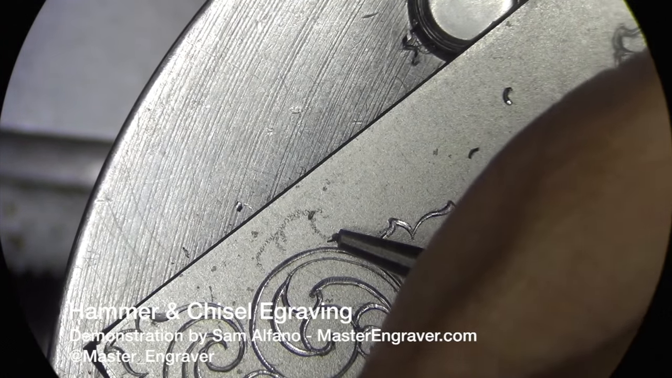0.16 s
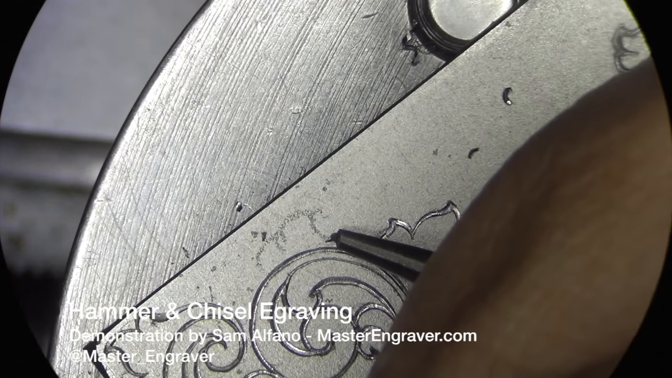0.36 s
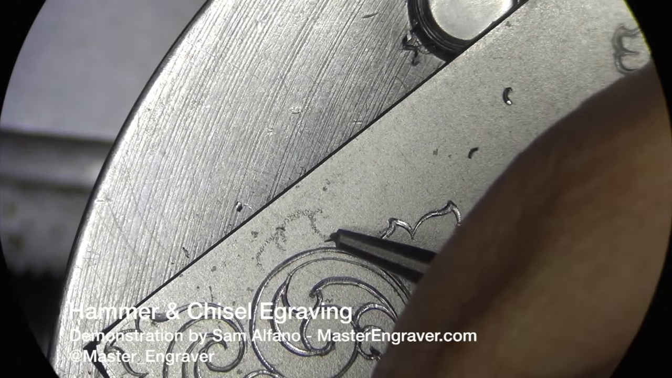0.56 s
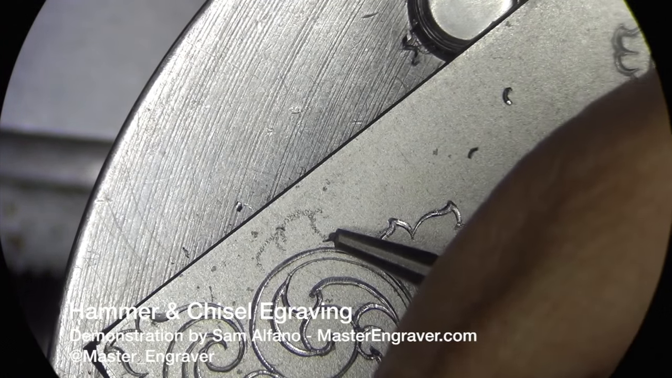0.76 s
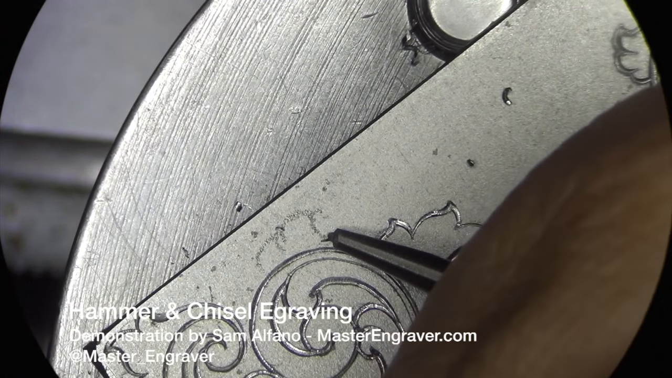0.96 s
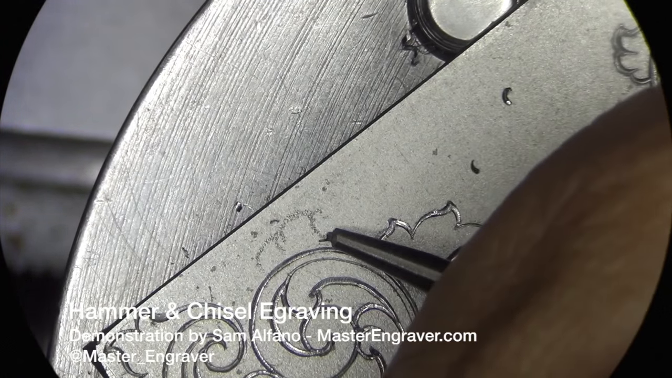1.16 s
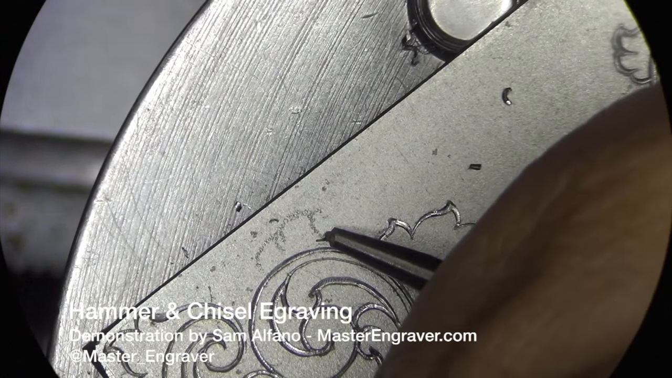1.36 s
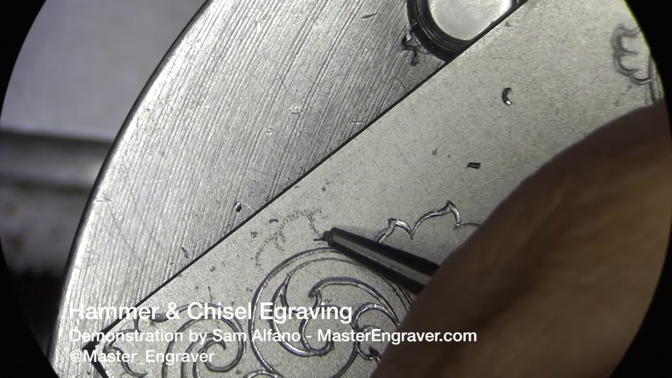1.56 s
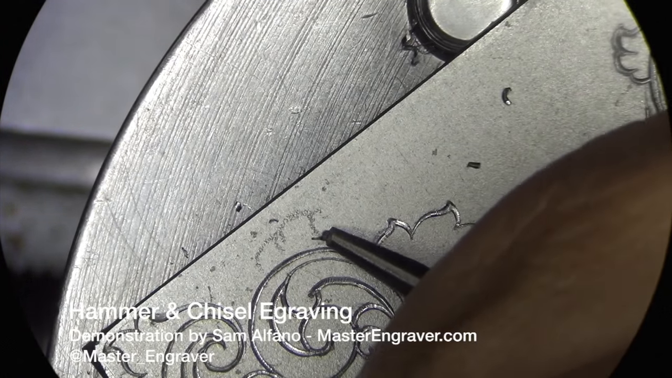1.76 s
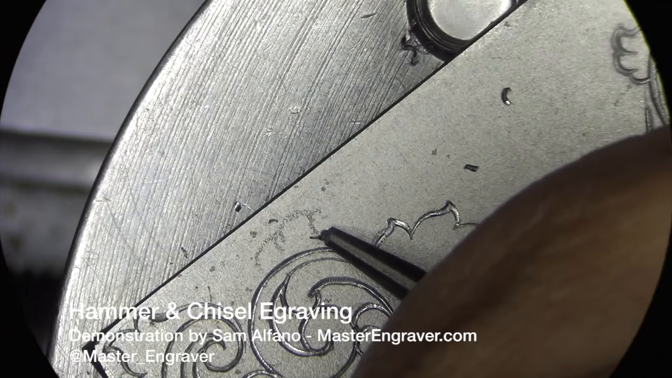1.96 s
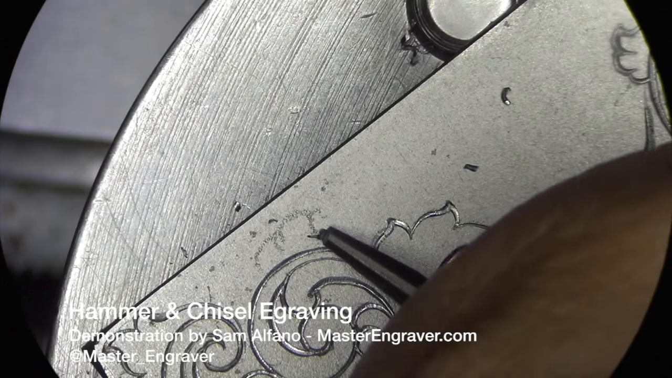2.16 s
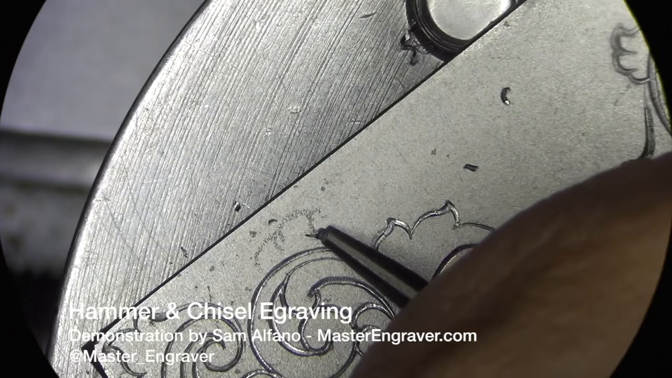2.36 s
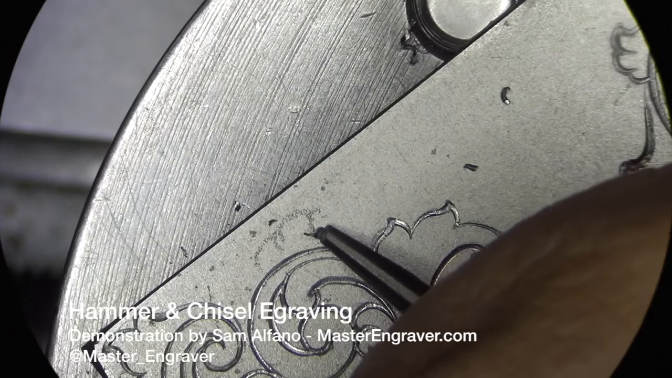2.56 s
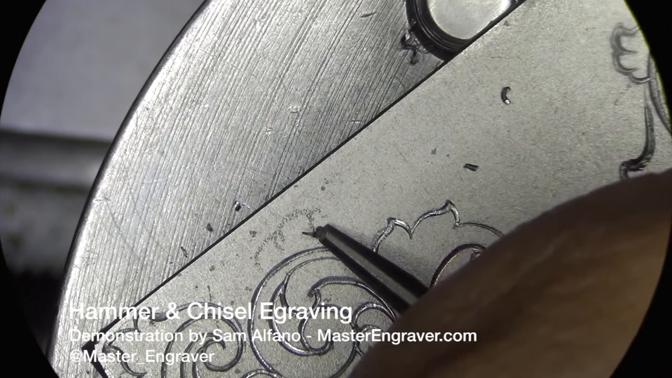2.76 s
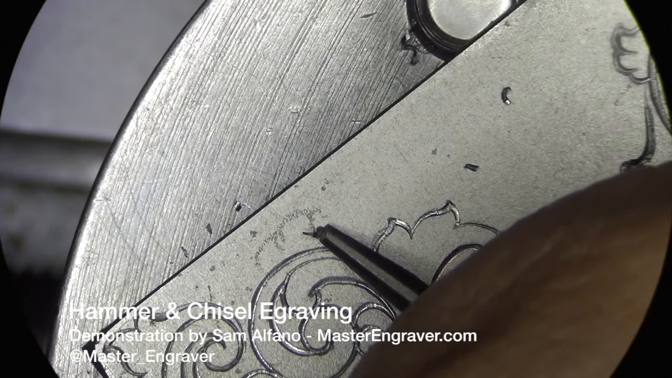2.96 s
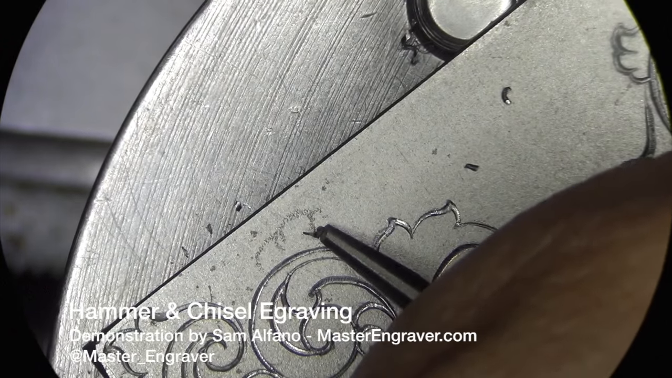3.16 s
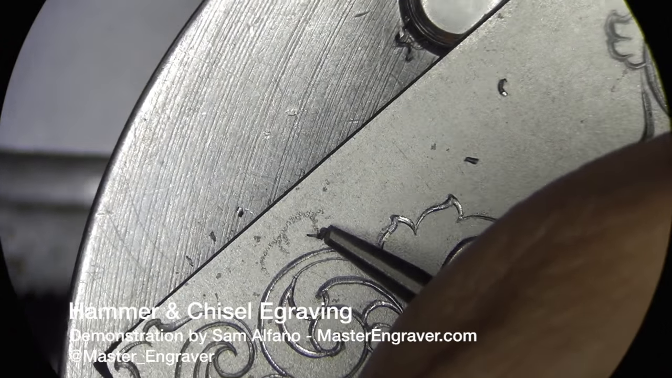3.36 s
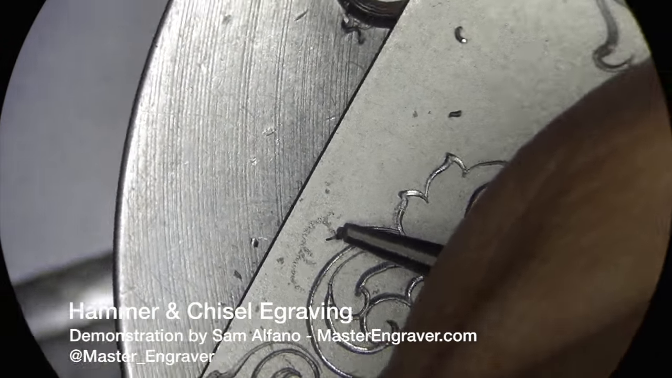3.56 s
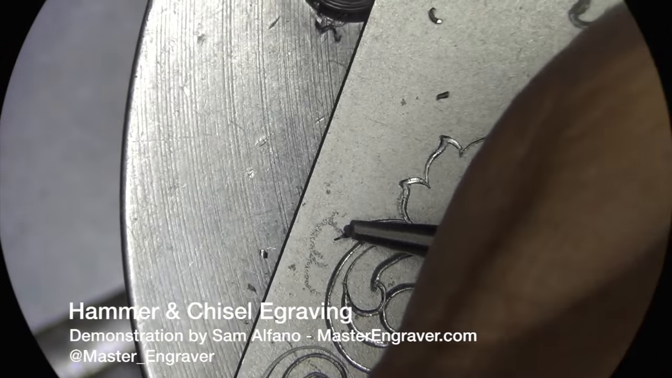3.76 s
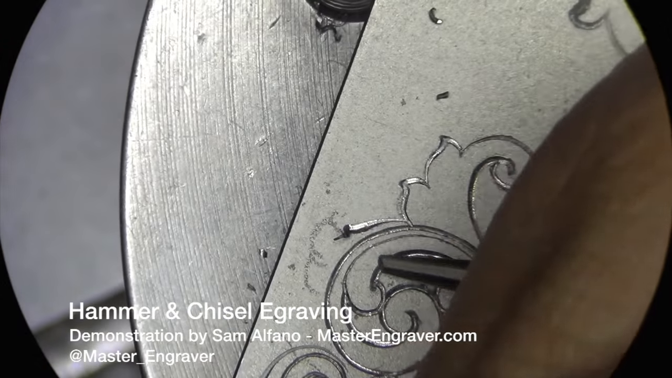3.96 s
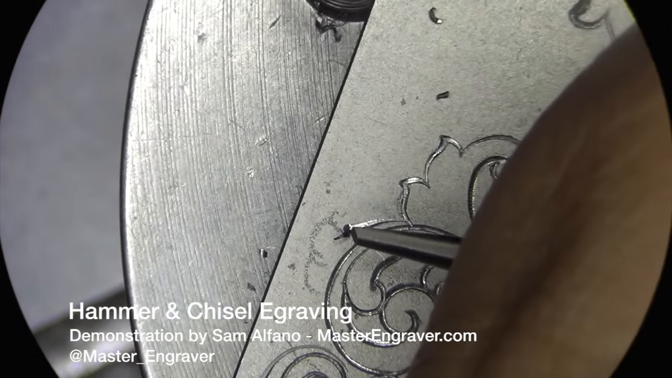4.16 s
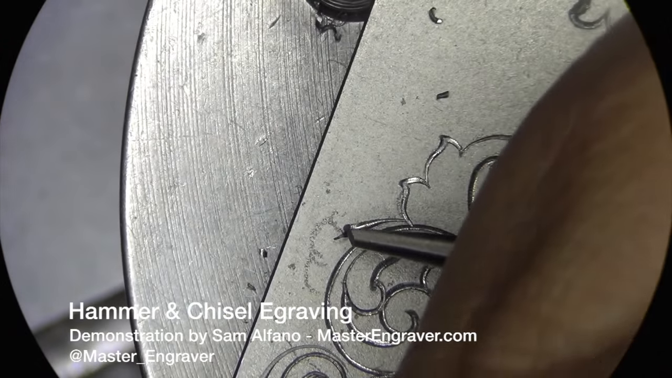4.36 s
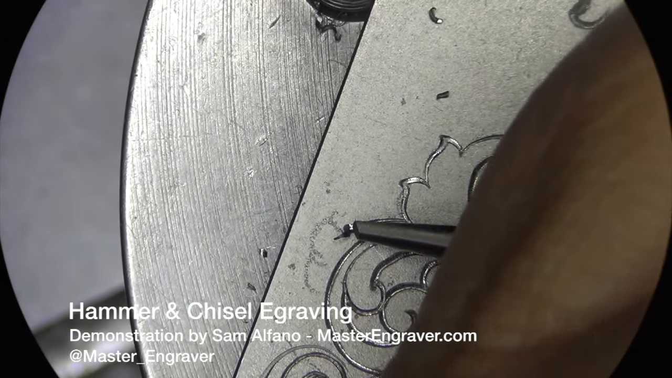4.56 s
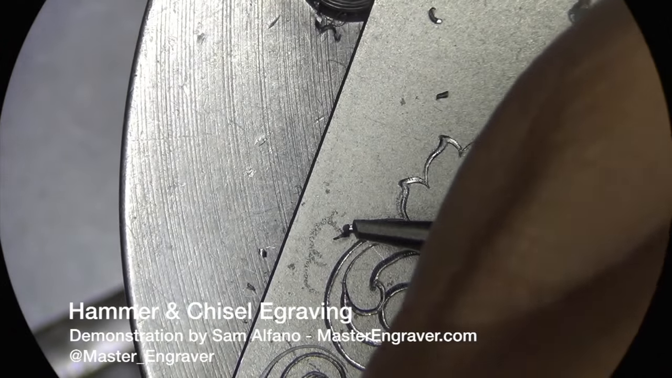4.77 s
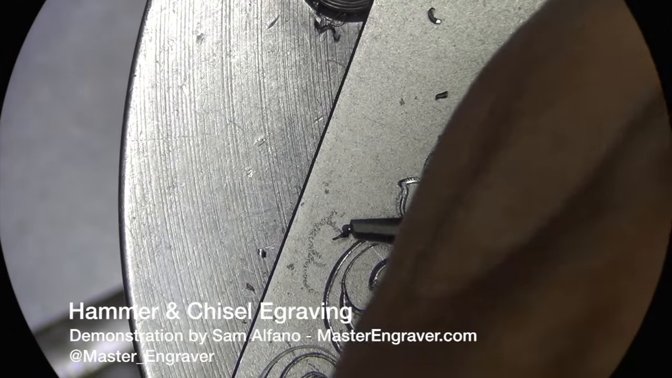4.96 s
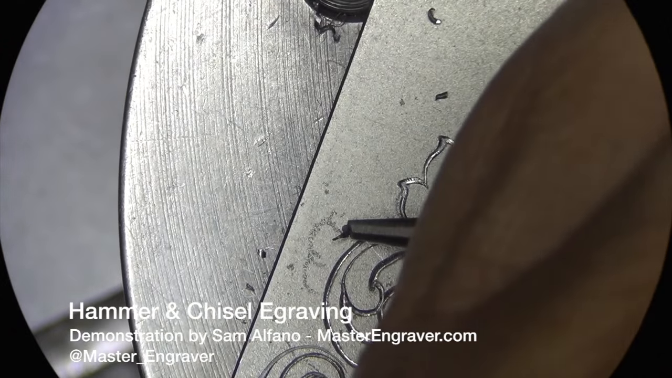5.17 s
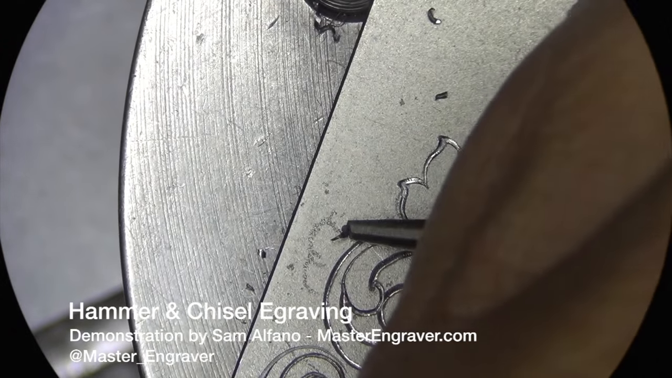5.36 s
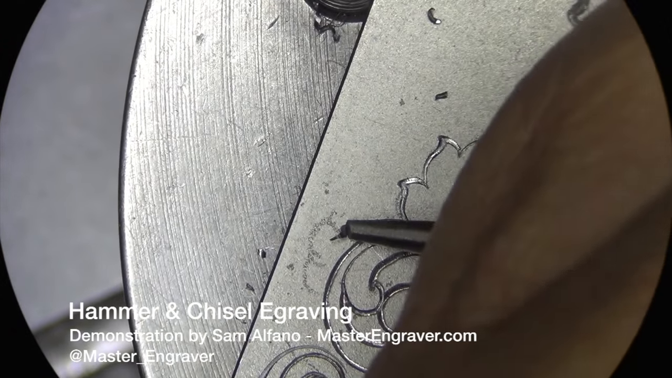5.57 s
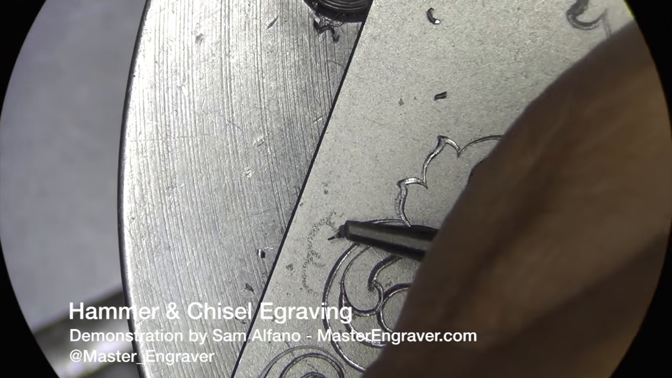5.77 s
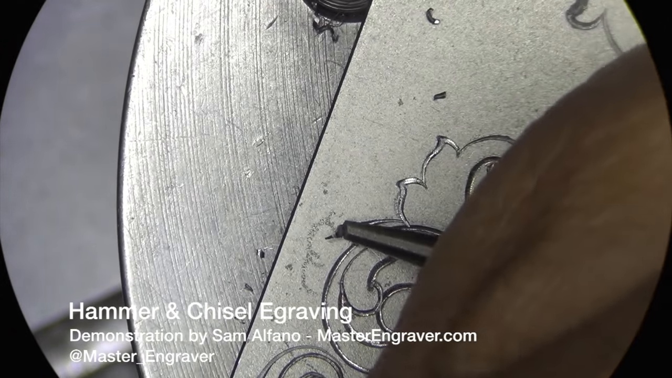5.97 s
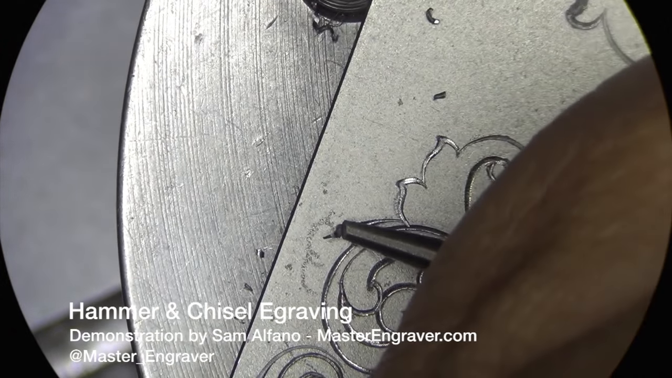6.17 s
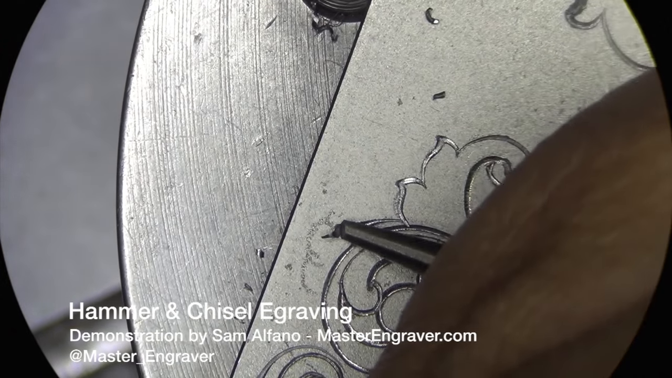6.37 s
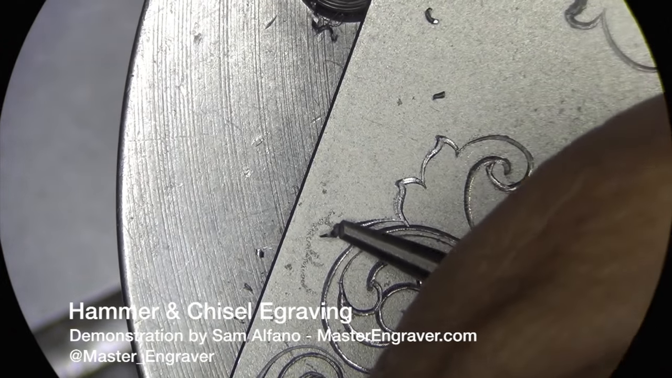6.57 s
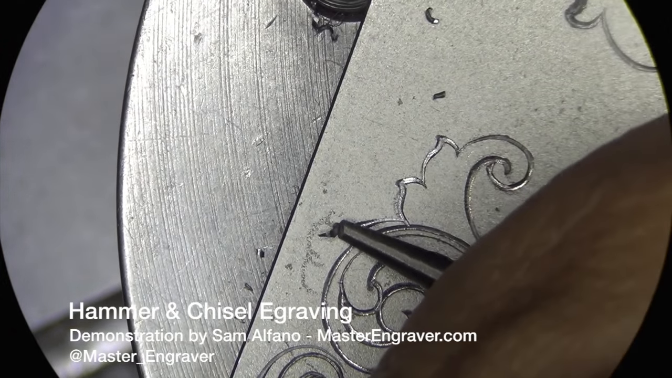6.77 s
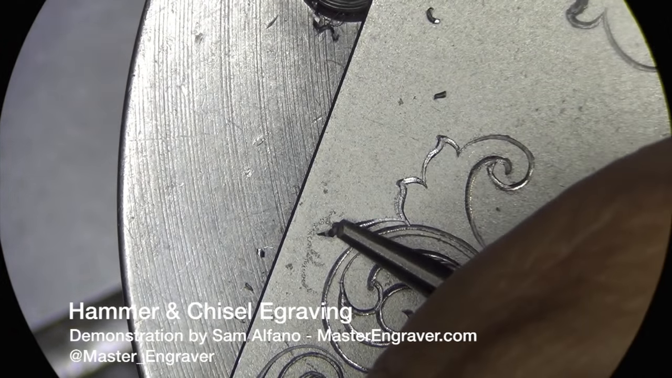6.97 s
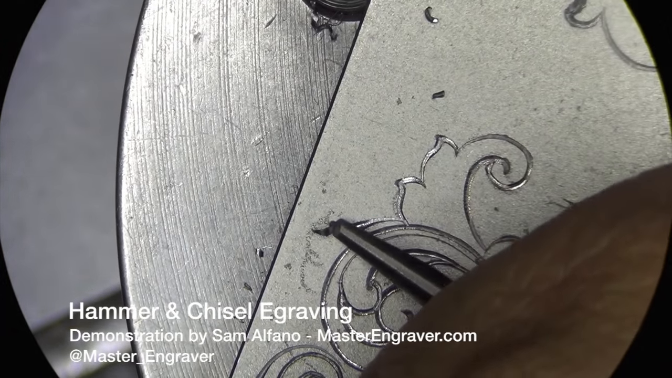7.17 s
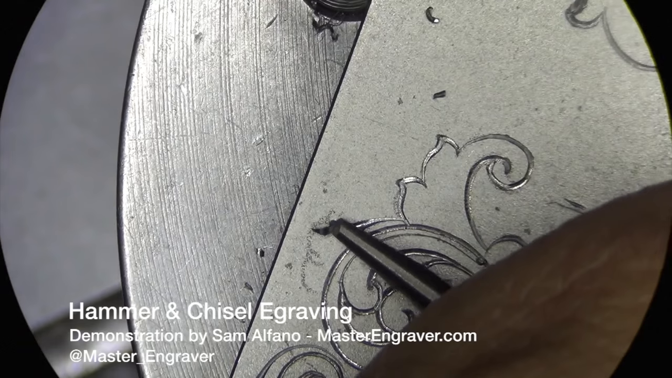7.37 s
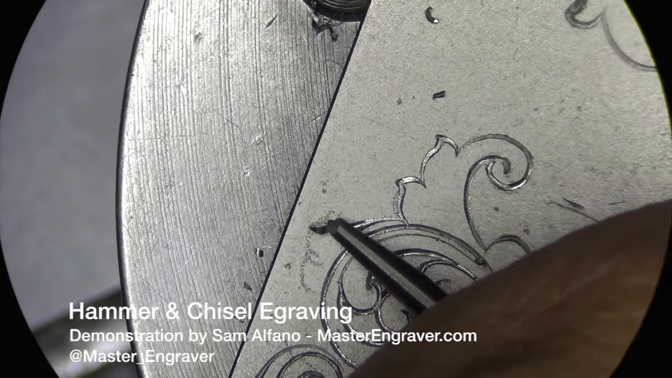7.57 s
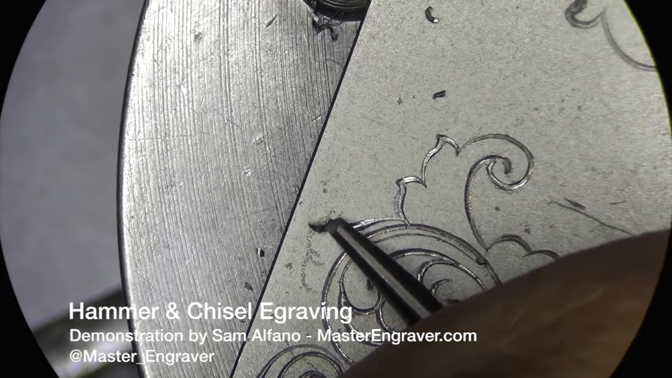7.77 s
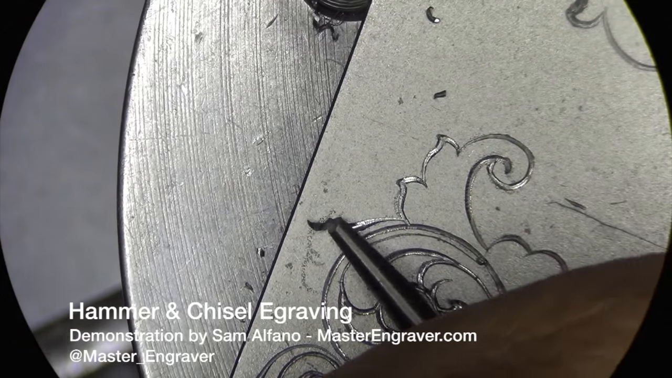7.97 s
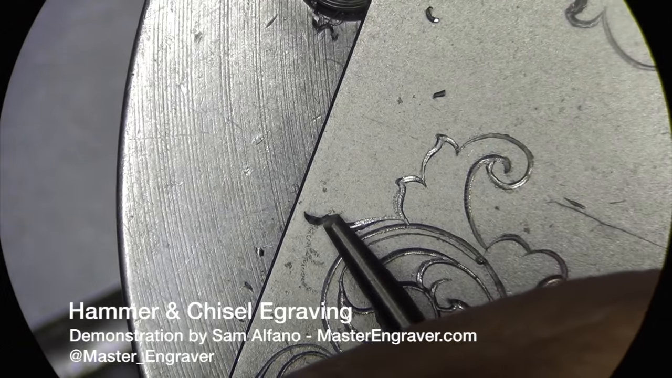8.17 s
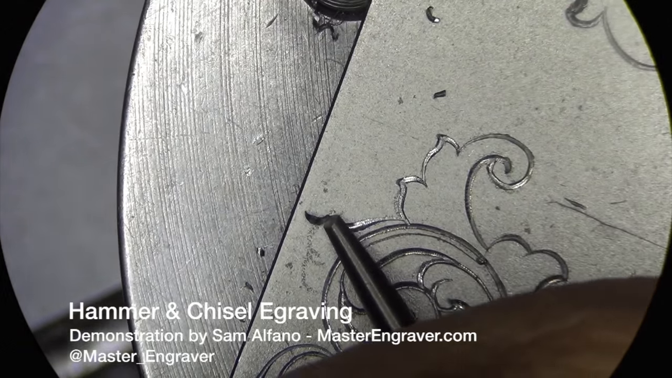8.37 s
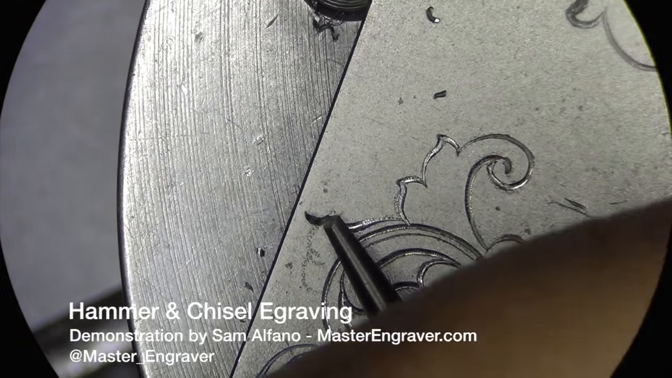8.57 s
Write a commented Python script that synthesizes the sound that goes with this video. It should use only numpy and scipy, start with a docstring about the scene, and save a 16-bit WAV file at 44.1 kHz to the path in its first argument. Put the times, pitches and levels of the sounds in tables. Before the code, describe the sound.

Sharp, dry metallic ticks at five a second, a pause with a brief scrape and tiny knocks, then more ticks in a hard-walled workshop.

```python
"""A fan's whirr, mains hum, air noise and a monitor's thin whine run throughout as shaped noise and tones.
Over them a small hammer drives an engraving chisel through a steel plate in a vise, about five blows a second.
Each blow is a cluster of damped steel modes with a noisy bite; some thump the bench, and a hard workshop answers.
As the first run of blows ends the vise is swivelled: rubbing, drag and small knocks, made of filtered noise.
A second even run follows; a few blows near the start and end of the cuts leave short pitched rings."""
import sys
import numpy as np
from scipy import signal
from scipy.fft import rfft, irfft, next_fast_len
from scipy.io import wavfile

SR = 44100
rng = np.random.default_rng(int(sys.argv[2]) if len(sys.argv) > 2 else 0)


def wav_out(sig):
    """Save sig, one row per channel (or a flat mono array), as 16-bit PCM at SR to the path in sys.argv[1]."""
    wavfile.write(sys.argv[1], SR, np.round(np.clip(np.atleast_2d(sig).T, -1, 1) * 32767).astype(np.int16))


N = 380141

# colour of the air noise: f/Hz, level/dB per Hz (relative)
AIR_COLOUR = [(20, -18.5), (55, 2), (100, -1), (135, 0.5), (200, -2.5), (270, -1), (420, -6), (680, -5.5),
              (950, -5), (1250, -12), (1550, -10.5), (2800, -17.5), (7000, -20.5), (15500, -21)]
# tones of mains and fan motor: f/Hz, level/dB rms
HUM_TONES = [(59.5, -73.5), (120, -75), (239, -89), (294.5, -74), (1812, -83.5)]
# hammer blows: t/s, strength/dB, hardness of the contact as extra treble/dB
BLOWS = [(0.1675, 0, 2), (0.3901, 1.5, 6.5), (0.596, 1.5, 5.5), (0.8037, 0.3, 6), (1.0043, -0.3, 6.5),
         (1.204, -1, 4.5), (1.4072, 0, 5), (1.6062, -0.5, 5), (1.8066, 1, 4.5), (2.0005, 0.2, 6.5),
         (2.1987, 0.9, 5), (2.3924, 2.5, 4.5), (2.601, 0.8, 4.5), (2.8035, 2.2, 4), (5.171, -2.5, 2.5),
         (5.3923, -3, 2), (5.5957, -0.7, 2.5), (5.7872, -1.7, 1.5), (5.9864, -1.5, -1), (6.1787, -1.7, 1.4),
         (6.3555, -1.4, -0.5), (6.5489, -1.2, -1.5), (6.7355, -0.5, -0.8), (6.9145, -0.9, -2),
         (7.0791, -0.8, -1.8), (7.2448, -0.5, 0), (7.4074, -0.5, -2.5), (7.5743, 0.2, 1),
         (7.739, -0.5, 1.4), (7.917, -2.5, 3.5), (8.094, -4.5, 1.6), (8.2657, -4, 1)]
# chisel, plate and vise ringing together: f/Hz, t60/s, level in first cut/dB, level in second cut/dB
STEEL_MODES = [(473, 0.029, -37.5, -31), (850, 0.015, -33.5, -26), (1061, 0.0089, -29.5, -30),
               (1502, 0.023, -28.5, -22), (1825, 0.022, -26, -25), (2136, 0.015, -18.5, -17),
               (2483, 0.016, -18, -20), (2846, 0.0064, -13, -7.5), (3280, 0.006, -10, -13.5),
               (3966, 0.0046, -11.5, -7), (4626, 0.0055, -8, -8.5), (5166, 0.0082, -9.5, -8),
               (5603, 0.015, -13.5, -13), (6007, 0.012, -15, -10.5), (6710, 0.013, -15.5, -18),
               (7130, 0.01, -23.5, -16.5), (7810, 0.011, -22.5, -19.5), (8360, 0.007, -26.5, -20),
               (9180, 0.0063, -15.5, -14), (9920, 0.0081, -22, -18), (10590, 0.0053, -19, -15.5),
               (11480, 0.0056, -28.5, -17.5), (12330, 0.01, -25.5, -20.5), (14170, 0.0034, -20.5, -17.5),
               (14700, 0.0064, -24.5, -22.5)]
# the workshop's answer, ahead of the room send: f/Hz, level/dB, t60/s
ROOM_BANDS = [(120, 10, 0.51), (257, 6.5, 0.35), (480, -2.5, 0.311), (1010, 2.5, .42), (1888, -3, 0.51),
              (3140, 0, 0.52), (4250, -1.5, 0.56), (4990, -9, 0.55), (6000, -4.5, 0.49), (9130, -3, 0.42),
              (15150, -2.5, 0.33)]
# sound that gets past the moving hand into the room: t/s, level/dB
ROOM_SPILL = [(0.17, -3), (0.39, -0.5), (1.35, 4), (2.35, 2), (2.8, -0.5), (5.17, -4.5), (6.0, -0.9),
              (7.7, -5.5), (8.05, -4.5)]
# notes of the steel where the grip is light: t/s, f/Hz, level/dB, t60/s
LOOSE_RINGS = [(0.1687, 2200, -15.5, 0.023), (5.171, 2300, -29, 0.013), (5.1712, 4300, -18, 0.016),
               (7.9178, 1510, -25, 0.05), (7.9165, 3980, -16, 0.018), (8.0942, 1463, -22, 0.041),
               (8.2658, 925, -30, 0.041), (8.2663, 3860, -33.5, 0.19)]
# blows that go through into the bench, ahead of the thump trim: t/s, level/dB
BENCH_THUMPS = [(0.8039, -36), (1.205, -42), (2.3938, -35.5), (2.599, -39), (2.805, -25), (6.5488, -39),
                (6.7356, -34)]
# turns of the vise: t at the loudest/s, length/s, rubbing level/dB, low drag level/dB
VISE_TURNS = [(1.406, 0.58, -81, -58.5), (3.602, 0.32, -56, -66.5), (3.956, 0.26, -68, -59),
              (6.592, 0.34, -83, -60.5)]
# colour of the rubbing: f/Hz, level/dB per Hz (relative)
RUB_COLOUR = [(150, -27), (330, -13), (500, 4), (800, -8), (1150, -4.5), (1600, -4.5), (2700, -10),
              (3650, -12.5), (4200, -21), (9000, -26), (15000, -37.5)]
# light contacts as the work is turned, ahead of the trims: t/s, level/dB, knock/dB, steel/dB
LIGHT_TOUCHES = [(3.241, -44, -2.5, -18), (3.279, -29.5, -8, -32), (3.932, -29.5, -16, -5),
                 (3.948, -42, -16, -1), (3.982, -49, -16, -5), (4.695, -48, -16, -4.5)]

SECOND_CUT_S = 4  # blows from here on belong to the second cut
# each cut starts at the surface, is deepest this long after its first blow, then slowly runs out
DEEPEST_S = 0.9
PLATE_FREE_DB, PLATE_DAMPED_DB = 0.5, -4.5  # plate near 1.5 kHz: edge at the surface, fully buried
BODY_FREE_DB, BODY_DAMPED_DB = 0, -3.65  # the same for the chisel's body near 3 kHz
ENTRY_DB, ENTRY_S = 5, 0.2  # extra ring of the plate as a cut begins, and its time constant
BODY_FOLLOWS = 0.41  # dB of plate and body per dB of strength: harder blows are brighter
TURN_EDGE_DB = -8  # level at both ends of a turn, against its middle
TOP_HZ = 15850  # band limit of the recorder


def amp(db):
    """Gain of a level in dB."""
    return 10 ** (np.asarray(db) / 20)


def unit(x):
    """Scale to rms 1."""
    return x / np.sqrt(np.mean(x ** 2) + 1e-20)


def along(points, hz):
    """Read a curve of (Hz, value) points on a log frequency axis."""
    f, v = np.transpose(points)
    return np.interp(np.log(hz + 1), np.log(f + 1), v)


def filtered(x, response):
    """Shape x by a response of frequency."""
    n = x.shape[-1]
    padded = next_fast_len(n + 8192)
    return irfft(rfft(x, padded) * response(np.fft.rfftfreq(padded, 1 / SR)), padded)[..., :n]


def noise(response):
    """Coloured noise of rms 1, as long as the scene."""
    return unit(filtered(rng.standard_normal(N), response))


def band(hz, centre_hz, width_hz):
    """Response of one resonance."""
    return 1j * hz * width_hz / (centre_hz ** 2 - hz ** 2 + 1j * hz * width_hz)


def add(track, s, sound):
    """Mix a sound in at time s."""
    part = track[..., round(s * SR):][..., :sound.shape[-1]]
    part += sound[..., :part.shape[-1]]


def workshop(air_db=-61.5, fan_db=-63.5, fan_hz=878, fan_width_hz=110, side_db=-69, whine_db=-69):
    """Mid and side of the background: air noise, a fan's narrow whirr, hum and a monitor's thin whine."""
    t = np.arange(N) / SR
    air = amp(air_db) * noise(lambda hz: amp(along(AIR_COLOUR, hz)))
    fan = amp(fan_db) * noise(lambda hz: band(hz, fan_hz, fan_width_hz) ** 2)
    hum = np.zeros(N)
    for tone_hz, db in HUM_TONES:
        hum += amp(db) * np.sqrt(2) * np.sin(2 * np.pi * (tone_hz * t + rng.random()))
    whine = amp(whine_db) * noise(lambda hz: band(hz, 15736, 10))
    # the side is widest in the bass
    width = [(60, 4), (130, -16.5), (300, -8.5), (2000, -22.5)]  # f/Hz, level/dB
    side = amp(side_db) * noise(lambda hz: amp(along(AIR_COLOUR, hz) + along(width, hz)))
    return np.array([air + fan + hum + whine, side])


def blow_colour(age, db, hard_db, hz):
    """Level/dB of each mode, age seconds into a cut: the buried edge damps the lower modes."""
    depth = age / DEEPEST_S * np.exp(1 - age / DEEPEST_S)
    follow_db = BODY_FOLLOWS * db
    entry_db = ENTRY_DB * np.exp(-age / ENTRY_S)
    plate_db = follow_db + PLATE_FREE_DB * (1 - depth) + PLATE_DAMPED_DB * depth + entry_db
    body_db = follow_db + BODY_FREE_DB * (1 - depth) + BODY_DAMPED_DB * depth
    curve = [(850, db), (1400, plate_db), (1600, plate_db), (2200, body_db), (3600, body_db),
             (4600, db), (7000, db), (9000, db + hard_db)]
    return along(curve, hz)


def spread(click):
    """The pulse runs back and forth in the chisel: all-passes smear it in time, not in colour."""
    for trip_s, echo in ((.00011, -.55), (.00054, .66)):
        gap = np.zeros(round(trip_s * SR) - 1)
        click = signal.lfilter(np.r_[echo, gap, 1], np.r_[1, gap, echo], click)
    return click


def ring(levels_db, t, attack_s=0.0004, scatter_db=1.6, detune=.009):
    """Steel modes damped by hand and vise; each blow meets them a little differently."""
    hz, t60 = np.array(STEEL_MODES).T[:2, :, None]
    level_chance, pitch_chance = rng.standard_normal((2, len(STEEL_MODES), 1))
    polarity = (-1) ** np.arange(len(STEEL_MODES))[:, None]
    size = amp(levels_db[:, None] + scatter_db * level_chance) * polarity
    modes = size * np.sin(2 * np.pi * hz * (1 + detune * pitch_chance) * t) * amp(-60 * t / t60)
    return spread(np.sum(modes * (1 - np.exp(-t / attack_s)), axis=0))


def bite(click, t, crunch_db=-12, crunch_t60=.015):
    """The edge tears on through the metal for a few milliseconds and keeps shaking the steel."""
    tearing = rng.standard_normal(len(t)) * t * amp(-60 * t / crunch_t60)
    tearing /= np.linalg.norm(tearing)
    return click + amp(crunch_db) * signal.fftconvolve(click, tearing)[:len(t)]


def near_echoes(click, s):
    """Hand and bench reflect each click; the paths lengthen slowly as the chisel swings round."""
    paths = ((.0015 + .00003 * s, .3), (.0028 + .00001 * s, -.24))  # delay/s, gain
    return filtered(click, lambda hz: 1 + sum(gain * np.exp(-2j * np.pi * hz * delay)
                                              for delay, gain in paths))


def all_sides(click):
    """The click as sent in all directions: a short pulse whose modes merge into one smooth colour."""
    ratio, lead = 1.09, SR // 500
    energy = np.cumsum(np.abs(rfft(click)) ** 2)
    k = np.arange(1, len(energy) + 1)
    # mean power in a sliding band, from k / ratio to k * ratio
    gathered = np.interp(k * ratio, k, energy) - np.interp(k / ratio, k, energy)
    power = np.maximum(gathered / (k * ratio - k / ratio), 0)
    return np.roll(irfft(np.sqrt(power)), lead)[:4 * lead]


def walls(scatter, gap_s=0.0034, early_db=7, early_fade_s=0.0058):
    """Room response from noise: strong first reflections, then a tail fading at each band's own t60."""
    room = np.array(ROOM_BANDS)
    hz, t, z = signal.stft(scatter, SR, nperseg=128)
    decay = amp(-60 * t / along(room[:, [0, 2]], hz)[:, None])
    late = np.maximum(t - gap_s, 0)
    onset = 1 - np.exp(-(late / 0.0028) ** 2)
    shape = decay * onset * (1 + amp(early_db) * np.exp(-late / early_fade_s))
    # equal energy in every band, so that the table alone sets the balance
    shape /= np.sqrt(np.sum(shape ** 2, axis=1, keepdims=True) * t[1] * SR)
    level = amp(along(room[:, :2], hz))[:, None]
    return signal.istft(z * shape * level, SR, nperseg=128)[1]


def boom(room, boom_db=-10, centre_hz=115, width_hz=55):
    """The bench top stirs the low resonance of the room, alike for every blow."""
    return amp(boom_db) * filtered(room, lambda hz: band(hz, centre_hz, width_hz) ** 2)


def hammer(click_db=-1, room_db=-1, fresh=0.096, room_follows=0.75,
           room_side_db=-15, direct_side_db=-27, lag_side_db=-17):
    """Mid and side of all blows; the moving hand shades the room send and part of the echo is new each time."""
    out, t = np.zeros((2, N)), np.arange(SR // 16) / SR
    hz, _, first_db, second_db = np.transpose(STEEL_MODES)
    still = rng.standard_normal((2, 2 * SR // 3))  # the part of the room shared by all blows
    blows = np.array(BLOWS)
    first = blows[:, 0] < SECOND_CUT_S
    for cut, modes_db in ((blows[first], first_db), (blows[~first], second_db)):
        for s, db, hard_db in cut:
            colour = blow_colour(s - cut[0, 0], db, hard_db, hz)
            direct = amp(click_db) * near_echoes(bite(ring(modes_db + colour, t), t), s)
            # a tiny lag between the microphones widens the treble
            side = amp(direct_side_db) * direct + amp(lag_side_db) * np.gradient(direct)
            add(out, s, np.array([direct, side]))

            # the walls hear all sides of the tool, so their colour changes less
            spill_db = room_db + np.interp(s, *np.transpose(ROOM_SPILL)) + room_follows * db
            spill_click = ring(modes_db + .5 * (colour - colour.mean()), t)
            spill = amp(spill_db) * all_sides(spill_click)
            moved = rng.standard_normal(still.shape)
            room = walls(np.sqrt(1 - fresh) * still + np.sqrt(fresh) * moved)
            answer = signal.fftconvolve(spill[None], room, axes=1)
            add(out, s, amp([[0], [room_side_db]]) * answer)
            add(out[0], s, boom(room[0]))
    return out


def loose_notes(line_width_hz=70):
    """Held more lightly, the steel keeps a short pitched ring, roughened as it chatters in the groove."""
    out, t = np.zeros(N), np.arange(SR // 4) / SR
    for s, hz, db, t60 in LOOSE_RINGS:
        # random walk of the phase
        chatter = np.cumsum(rng.standard_normal(len(t))) * np.sqrt(2 * np.pi * line_width_hz / SR)
        add(out, s, amp(db - 60 * t / t60) * np.sin(2 * np.pi * hz * t + chatter))
    return out


def in_room(x, wet_db):
    """A small sound with the workshop's answer mixed in."""
    room = walls(rng.standard_normal(SR // 2))
    return x + amp(wet_db) * signal.fftconvolve(x, room)[:N]


def thump(t, push_s=0.002, recoil_s=0.011, recoil_share=0.18):
    """The bench is pushed down briefly and springs back."""
    def lobe(u, order):
        return (u * np.exp(1 - u)) ** order
    return lobe(t / push_s, order=4) - recoil_share * lobe(t / recoil_s, order=2)


def bench(thump_db=-3.5, thump_side=.55):
    """Mid and side of the low thumps, felt mostly by the left microphone."""
    out, t = np.zeros((2, N)), np.arange(SR // 16) / SR
    for s, db in BENCH_THUMPS:
        add(out, s, amp(db + thump_db) * thump(t) * np.array([[1], [thump_side]]))
    return out


def swivel(drag_hz=245, drag_width_hz=115, sing_hz=3600, sing_db=-19, sing_delay_s=0.1):
    """The heavy vise rubs unevenly as it turns, sings faintly and drags low; each turn swells and fades."""
    t = np.arange(N) / SR
    rubbing, dragging = np.zeros((2, N))
    for s, length, rub_db, drag_db in VISE_TURNS:
        swell_db = np.maximum(TURN_EDGE_DB * (2 * (t - s) / length) ** 2, -120)
        rubbing += amp(rub_db + swell_db)
        dragging += amp(drag_db + swell_db)
    catches = amp(2.5 * noise(lambda hz: hz < 70))  # uneven grip: slow random level
    rub = rubbing * unit(catches * noise(lambda hz: amp(along(RUB_COLOUR, hz))))
    sing_swell = amp(sing_db) * np.interp(t - sing_delay_s, t, rubbing)
    sing = sing_swell * noise(lambda hz: band(hz, sing_hz, 110) ** 2)
    drag = dragging * noise(lambda hz: band(hz, drag_hz, drag_width_hz) ** 2)
    return rub + sing + drag


def touches(knock_db=-2, steel_db=-4, knock_t60=0.045, steel_t60=0.026):
    """Small knocks of the vise and ticks of the chisel point: noise bursts through three resonances each."""
    out, t = np.zeros(N), np.arange(SR // 8) / SR

    def burst(response, t60):
        return unit(filtered(rng.standard_normal(len(t)), response)) * amp(-60 * t / t60)

    def vise(hz):
        return band(hz, 500, 160) - 0.81 * band(hz, 1020, 280) + band(hz, 1600, 520)

    def point(hz):
        return band(hz, 4400, 550) - 0.58 * band(hz, 5670, 790) + 0.16 * band(hz, 9640, 900)

    for s, db, knock, steel in LIGHT_TOUCHES:
        add(out, s, amp(db + knock + knock_db) * burst(vise, knock_t60))
        add(out, s, amp(db + steel + steel_db) * burst(point, steel_t60))
    return out


def scene():
    """Everything reaches a close pair of microphones nearly alike: mid and side become left and right."""
    mid, side = workshop() + hammer() + bench()
    mid = mid + in_room(loose_notes(), wet_db=-8) + swivel() + in_room(touches(), wet_db=-6.5)
    return np.array([mid + side, mid - side])


def record(dry):
    """The recorder cuts steeply above its band limit."""
    return filtered(dry, lambda hz: 1 / np.sqrt(1 + (hz / TOP_HZ) ** 300))


dry = scene()
out = record(dry)
wav_out(out)
```